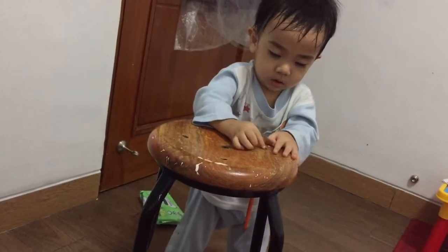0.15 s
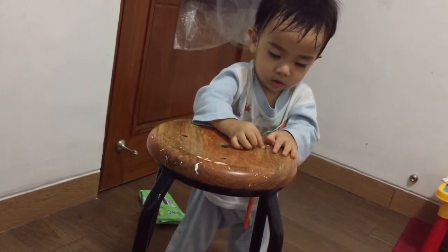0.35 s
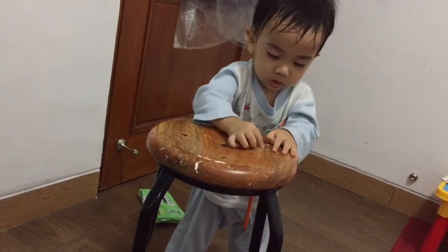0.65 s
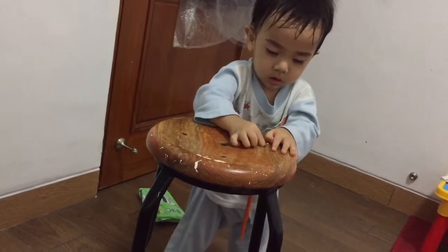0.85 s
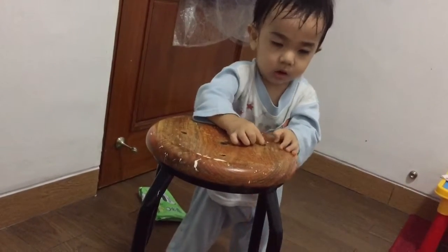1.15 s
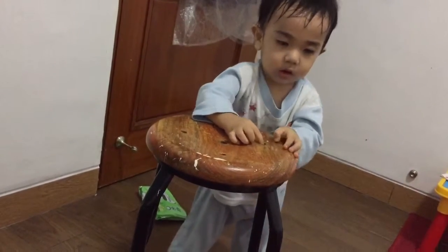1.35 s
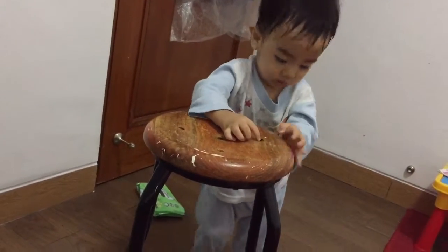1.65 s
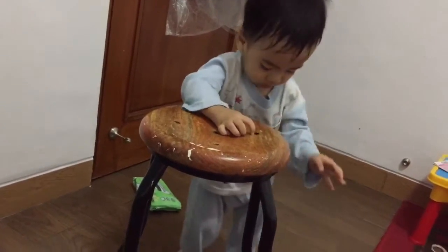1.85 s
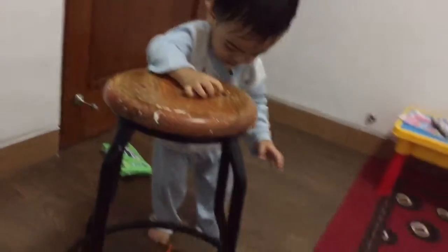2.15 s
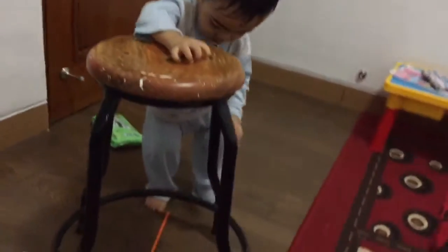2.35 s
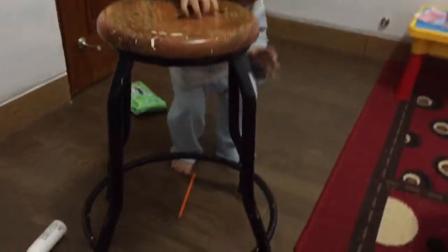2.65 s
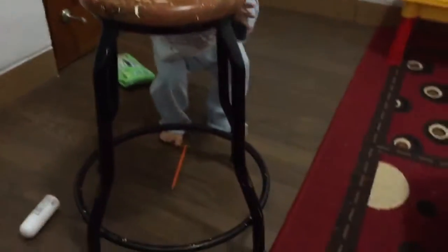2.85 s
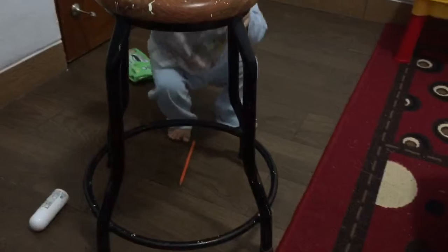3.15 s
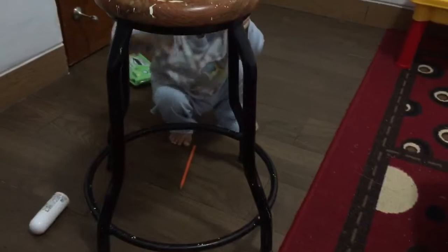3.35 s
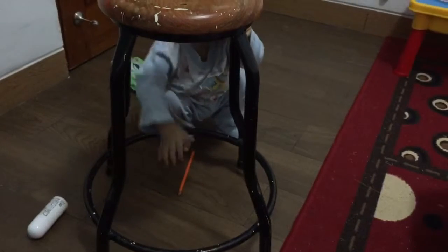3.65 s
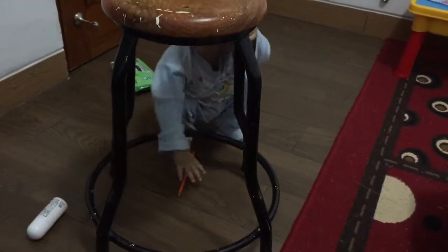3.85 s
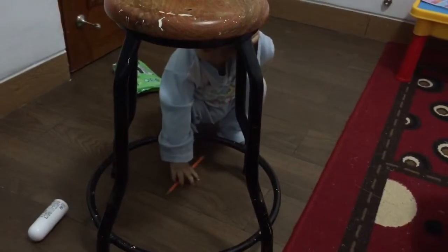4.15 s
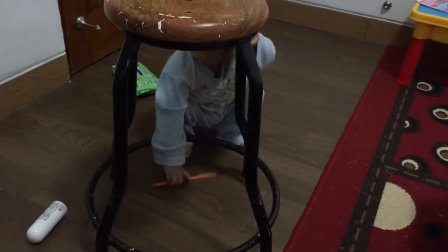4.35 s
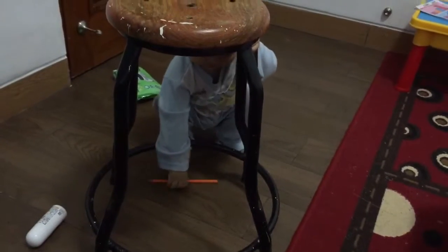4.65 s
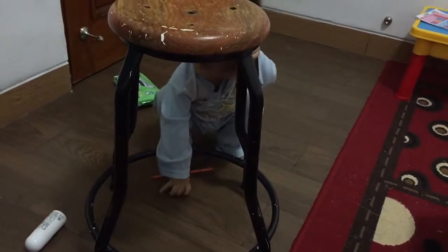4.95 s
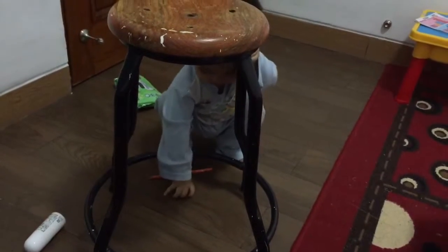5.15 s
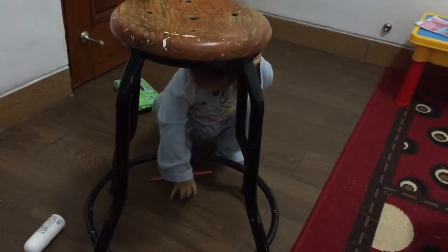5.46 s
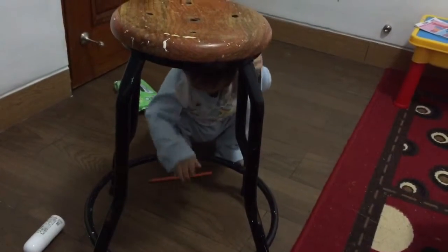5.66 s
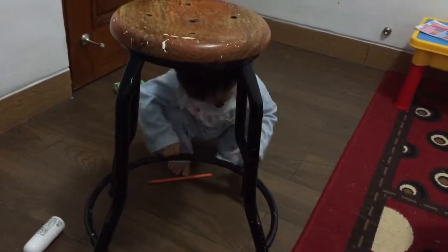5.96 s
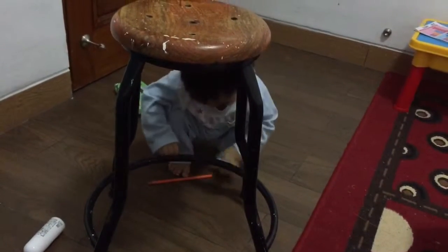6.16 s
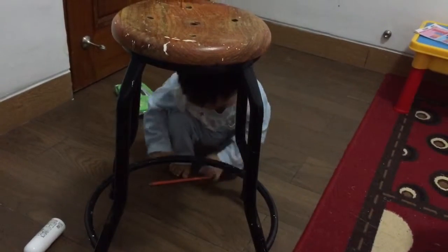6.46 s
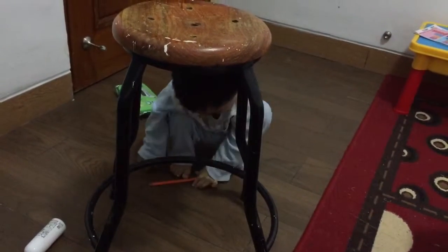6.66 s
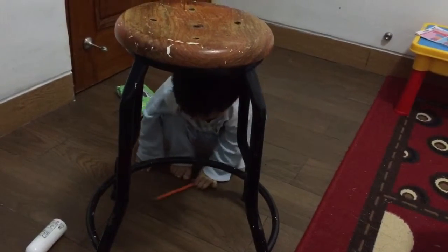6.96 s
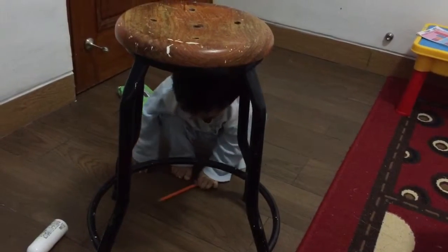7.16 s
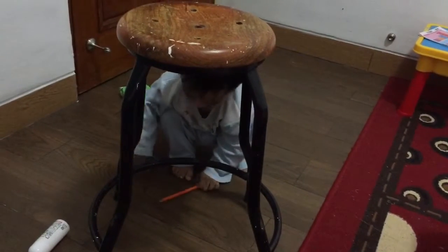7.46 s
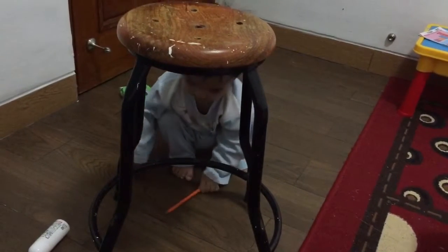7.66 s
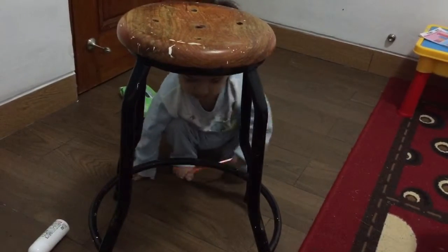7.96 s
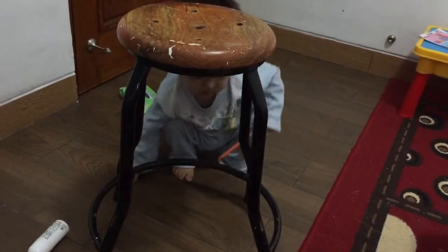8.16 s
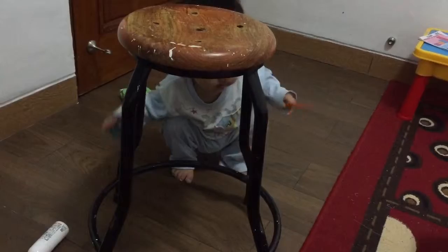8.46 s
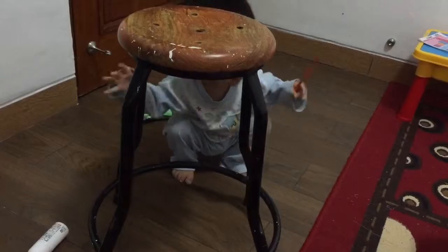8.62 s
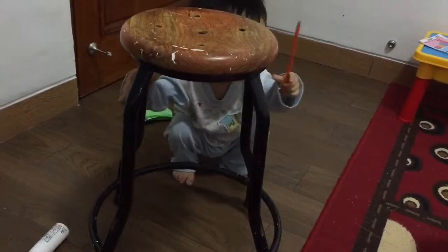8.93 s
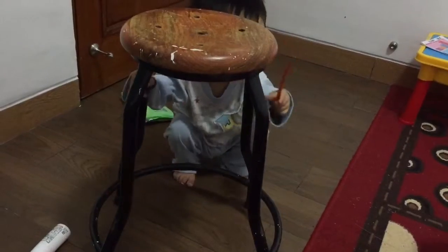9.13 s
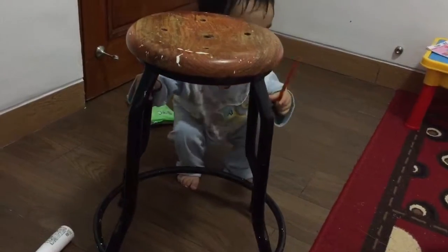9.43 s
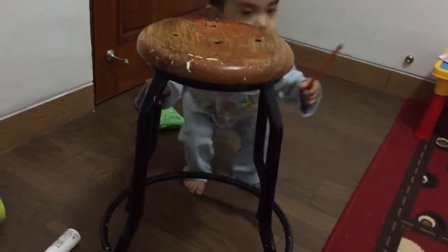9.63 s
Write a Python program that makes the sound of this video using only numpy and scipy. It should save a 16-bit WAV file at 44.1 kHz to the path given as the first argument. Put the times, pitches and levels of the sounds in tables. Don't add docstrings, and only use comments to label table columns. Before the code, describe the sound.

A wooden pencil clacks through a stool seat, bounces on a wood floor, then small hands thump and rub boards and clink steel legs.

```python
import sys
import numpy as np
from scipy import signal
from scipy.fft import rfft, irfft, next_fast_len
from scipy.io import wavfile
from scipy.ndimage import uniform_filter1d, map_coordinates

SR = 44100
rng = np.random.default_rng(int(sys.argv[2]) if len(sys.argv) > 2 else 0)


def persist_wave(psi):
    counts = np.round(np.clip(psi, -1, 1) * 32767).astype(np.int16)
    wavfile.write(sys.argv[1], SR, np.atleast_2d(counts).T)


def rack_gain(trim_db):
    fader = np.asarray(trim_db, float)
    return 10 ** (fader / 20)


N = 431738

PENCIL_CONTACTS = [(1.2377, -22.5, 0, -9, 0.5), (1.3352, -48.5, 8.5, 2, 3), (1.6328, -14.5, -25, 7, 1.5),
                   (1.6508, -32, -24, 11, 7), (1.7531, -20.5, -44, 4.5, -1), (1.7969, -30, -20, -17, -1),
                   (1.8577, -35.5, -30, -20, -2), (1.8747, -55, -22, -15, -3), (1.8803, -40, -23, -23, -2),
                   (1.933, -44, -19, -10, 3), (1.957, -38, -23, -12, -2), (1.9599, -33, -32, -20, -2.5),
                   (1.983, -50, -13, -18, 9), (1.9936, -50, -27.5, -10, 4), (3.492, -59, -28, -40, 6),
                   (3.517, -55, 4, -14, -1), (4.197, -62, -5, -17.5, 7), (4.3609, -54, -25.5, -10, 2),
                   (5.1097, -45, -22.5, -15, -6.5), (5.13, -42.5, -23, -10, -2.5),
                   (5.1418, -33, -32, 4, -2.5), (5.1445, -32, -28, 4, -2), (5.181, -37, -29, -22, -1),
                   (5.308, -58, -15, -41, -3), (8.1527, -29.5, 4.5, -11, -1), (8.525, -48.5, -19, 1, -1)]
# pitch [Hz], width [Hz], level [dB].
PENCIL_BENDING = [(2206, 290, -10.5), (4076, 165.6, -3), (6110, 360, -4.5), (8760, 650, 1.5)]
# pitch [Hz], width [Hz], level [dB].
PENCIL_TIP = [(11600, 820, 2.5), (13650, 1260, 0), (14360, 1400, 1.5)]
# pitch [Hz], width [Hz], level [dB].
PENCIL_SONG = [(2200, 70, -4), (4100, 85, 0), (6250, 130, -1)]
# pitch [Hz], width [Hz], level [dB].
STRUCK_WOOD = [(366.6, 190, -18), (970, 250, -2), (1350, 170, 1.5), (1610, 340, -1), (2370, 1000, -11),
               (3750, 440, -11), (5200, 900, -16)]

# start [s], peak [dB], board pitch [Hz], knuckle slap [dB].
THUMPS = [(1.238, -55, 243, 3), (2.965, -64, 130, 5), (3.365, -49.5, 217, -15.5), (3.804, -42, 207, -19),
          (3.832, -60.5, 200, -13), (3.969, -48, 197, -21), (5.171, -58.5, 119.6, -15),
          (5.19, -54, 52, -25), (5.49, -51.5, 101, -17), (5.629, -61, 164, 1), (6.072, -51.5, 169, -20),
          (6.11, -52.5, 189, -21), (6.724, -58, 172, -17.5), (7.322, -51, 179, -16.5),
          (8.142, -51, 218, -1), (8.385, -56, 210, 5), (8.781, -49.5, 175.4, 0.5),
          (8.822, -62.5, 183, -18.5), (9.297, -52.5, 168, -8)]
# start [s], peak [dB], board pitch [Hz], knuckle slap [dB],
# frame ring re peak [dB].
SHOVES = [
    (3.471, -41.5, 195, 1.5, -8.5),
    (3.501, -45.5, 95, 6, 1.5),
    (3.53, -40.5, 191, -32, -38),
    (5.144, -48.5, 220, -20, -5),
    (5.401, -36, 215, -7, -13),
    (5.445, -45.5, 171, 6.5, -3.5),
    (9.244, -45, 197, 0, -13),
    (9.264, -44, 82, -0.5, -10),
]
# start [s], peak [dB], pitch [Hz], width [Hz].
BUMPS = [(1.8812, -41, 6300, 250), (1.961, -44, 4050, 120), (3.474, -46, 590, 30), (3.485, -60, 3990, 27),
         (3.512, -52, 2450, 120), (3.663, -48.5, 781, 56), (3.72, -55, 750, 50), (3.76, -55, 848, 29),
         (3.815, -51, 1220, 44), (3.954, -61, 3130, 22), (5.132, -54, 4050, 40), (5.143, -47, 1350, 48),
         (5.143, -55, 945, 44), (5.1817, -44, 6300, 250), (5.41, -48, 480, 35), (6.075, -57, 2700, 90),
         (6.104, -44, 600, 16), (6.101, -53, 1290, 20), (6.103, -58, 990, 22), (6.107, -39.5, 655, 15),
         (9.254, -46, 800, 110), (8.778, -42, 690, 120), (8.785, -51, 1540, 110), (6.215, -58, 680, 14),
         (5.2, -62, 4100, 30), (9.275, -55, 1400, 70)]
# pitch [Hz], width [Hz], level [dB].
KNUCKLE = [(314, 97, 0.5), (422, 400, -8), (712, 205, -4), (1420, 250, -30)]
# pitch [Hz], level [dB], decay t60 [s].
FRAME_MODES = [(587, 0, .13), (640, -7, .13), (750, -7, .1), (860, -8, .1), (990, -3, .15), (1280, -6, .1),
               (1510, -16, .1)]

# start [s], level [dB], time of a touch [s], pitch it damps around [Hz],
# change of those modes [dB].
RAPS = [
    (8.1396, -30, 8.3, 989, -13),
    (8.3846, -31.5, 8.422, 1730, -9),
]
# level [dB], decay t60 [s].
FOOT_RING_HZ = [280, 587, 638, 707, 796, 855, 989, 1277, 1407, 1510, 1840, 1890, 2476, 2902, 2950, 3337,
                4110, 4269, 4490, 5674, 6153, 6320, 6379, 6444, 6874, 7730, 8220, 15590]
FOOT_RING = [(-22, 0.5), (-2.4, 0.38), (3.3, 0.32), (-11.4, 0.31), (-7.8, 0.3), (-8.1, 0.32), (-2.7, 0.46),
             (-4.8, 0.47), (-17.3, 0.6), (-7.2, 0.43), (-11.6, 0.36), (-9.1, 0.35), (-18.4, 0.38),
             (-17.0, 0.39), (-16, 0.25), (-11.4, 0.26), (-13.7, 0.24), (-19.4, 0.32), (-27.0, 0.42),
             (-20.7, 0.34), (-24.6, 0.55), (-14.9, 0.44), (-17.5, 0.38), (-15.2, 0.32), (-24.6, 0.32),
             (-27.1, 0.33), (-10, 0.08), (-23.2, 0.33)]
# level [dB], decay t60 [s].
LEG_HZ = [280, 587, 1277, 1507, 1596, 1711, 1749, 2401, 2680, 2740, 2793, 2898, 2950, 3349, 3468, 3532,
          3693, 3849, 4012, 4111, 4382, 4510, 4743, 5572, 5852, 7267, 8064, 8290, 8678, 15100]
LEG = [(-28.1, 0.6), (-25.4, 0.43), (-4.1, 0.27), (-11.9, 0.35), (-2.4, 0.2), (1.2, 0.22), (4.7, 0.22),
       (-21.4, 0.34), (-0.8, 0.18), (-6, 0.28), (-4.5, 0.26), (-10.5, 0.48), (-3.6, 0.29), (-7.7, 0.26),
       (-12, 0.33), (-5, 0.32), (-20.9, 0.3), (-13.0, 0.27), (-6.4, 0.24), (-6.3, 0.22), (-11.2, 0.32),
       (-12.2, 0.28), (-13, 0.25), (-12.0, 0.22), (-17.5, 0.26), (-21.9, 0.26), (-14.4, 0.4), (-20.5, 0.25),
       (3, 0.03), (-31.6, 0.3)]
# frequency [Hz], density [dB per Hz].
CLATTER = [
    [(330, -47.5), (490, -45), (570, -16), (992, -24), (1080, -36), (1280, -19), (1910, -3), (2170, -17.5),
     (4230, -15.5), (5070, -20), (6340, -17.5), (10800, -34), (15700, -44)],
    [(680, -68), (1150, -21), (1260, -11), (1720, -20), (2190, -22.5), (2730, -18), (3110, -10), (3430, -9),
     (6620, -23), (8330, -32), (10000, -35), (15700, -39)],
]

# frequency [Hz], density [dB per Hz].
SKIN = [(1470, -36), (2500, -2), (3100, -2.5), (3220, -7), (3700, -2), (4960, -13), (6590, -4),
        (7560, -5.5), (8690, -3.5), (10100, -9.5), (15700, -12)]
SCUFF = [(900, -31), (1500, -8.5), (1850, 2), (2350, -5.5), (2800, -25.5), (4500, -34)]
RUB = [(300, -48), (600, 6.5), (850, 1.5), (1300, 0.5), (1800, -2), (3000, -23.5)]
# peak time [s], peak [dB], swell over 20 dB [s],
# fade over 20 dB [s].
SKIN_STROKES = [(1.615, -64, .035, 0.016), (3.494, -66, 0.026, 0.085), (3.82, -72.5, 0.2, 0.026),
                (3.98, -64.5, 0.1, 0.065), (4.212, -79.5, .15, .12), (5.668, -78.5, 0.1, 0.19),
                (5.95, -71.5, 0.38, 0.45), (6.045, -65.5, 0.022, 0.13), (6.09, -68, 0.12, 0.061),
                (7.046, -72, 0.069, .03), (9.252, -72, 0.042, 0.16)]
SCUFF_STROKES = [(1.612, -64, 0.07, 0.064), (2.854, -57, 0.011, 0.016), (3.494, -69, 0.13, 0.42),
                 (3.82, -80, .45, 0.073), (3.988, -79.5, 0.078, .06), (4.212, -74, 0.059, 0.28),
                 (5.69, -68.5, 0.11, 0.27), (6.082, -77.5, 0.095, .03), (7.046, -83, 0.11, .15),
                 (7.946, -58.5, 0.017, 0.15), (8.778, -75.5, 0.043, .04), (9.252, -78, 0.052, 0.2)]
RUB_STROKES = [
    (2.854, -78, .06, .04),
    (3.494, -52.5, 0.046, 0.056),
    (3.82, -54.5, 0.34, 0.082),
    (3.988, -49, 0.092, 0.08),
    (5.69, -67, 0.14, 0.37),
    (6.11, -53, 0.066, 0.067),
    (7.046, -69, 0.33, .08),
    (8.778, -58, 0.024, 0.017),
    (9.252, -48.5, 0.014, 0.064),
]

# start [s], peak [dB], base pitch [Hz] (it sags to 0.55 of
# this), # length [s].
GRIP_POPS = [
    (2.489, -64, 100.3, 0.059),
    (2.704, -46, 120.5, 0.019),
    (2.844, -45, 102, 0.02),
    (9.672, -55.5, 104.5, 0.037),
]

# frequency [Hz], density [dB per Hz].
RUMBLE = [(12, -58), (20, -26), (35, 3), (59, 4.5), (151, -5.5), (182, -3), (214, -5.5), (280, -5),
          (308, -5.5), (500, -16.5), (650, -43), (1100, -120)]
HISS = [(240, -15), (400, -5), (519, -3.5), (889, -2.5), (1250, -4.5), (1950, -2), (2420, -5), (2750, -8.5),
        (3280, -9.5), (3540, -8), (4890, -14), (9460, -18.5), (10400, -20), (13100, -20), (15700, -23)]
# time [s], rumble level [dB].
RUMBLE_LEVEL = [(0.0, -70.5), (1.75, -71), (3.9, -67), (4.4, -70.5), (9.79, -70.5)]
# pitch [Hz], amplitude [dB].
WHIRR_TONES = [(183, -83), (1911, -87), (2428, -91), (3601, -94)]

# frequency [Hz], t60 [s].
ROOM_DECAY = [(100, 0.42), (500, 0.28), (2000, 0.29), (6000, 0.26), (10000, .26), (15000, 0.22)]
# delay [s], level [dB].
WALL_ECHOES = [(.0013, -5), (.0023, -9), (.0036, -12), (.0062, -15), (.0182, -17), (.0305, -24)]
# frequency [Hz], width [Hz], depth [dB].
PORT_DIPS = [(3470, 600, -1), (5040, 240, -2.5), (7590, 572, -3.5), (10280, 370, -4)]


def pencil():
    out = np.zeros(N)
    tip, wood, song = knock(PENCIL_TIP), knock(STRUCK_WOOD), knock(PENCIL_SONG)
    t = np.arange(8192) / SR
    thin = signal.lfilter(*signal.butter(3, 900, "high", fs=SR), t[:256] == 0)
    blow_delay = 0.0005
    for s, db, wood_db, sharp_db, direct_db in PENCIL_CONTACTS:
        tilt_db = 0.8 + 0.45 * min(db + 45, 0) + 0.038 * sharp_db
        body = knock([(hz, w, level + k * tilt_db) for k, (hz, w, level) in enumerate(PENCIL_BENDING)])
        free = body + rack_gain(-17) * song + rack_gain(sharp_db) * tip
        blow = np.convolve(free, thin)[:len(t)] + rack_gain(wood_db) * wood
        place(out, s + blow_delay, rack_gain(db - 2 + direct_db) * blow, wet_db=-3.5 - direct_db, wall_db=-0.5)

        grit = signal.lfilter([1, 0, 0, -1], 1, rng.standard_normal(len(t)))
        crack = np.convolve((grit * np.exp(-t / 0.0005))[:1024], thin)
        crack_db = db - 8 + 0.5 * sharp_db + direct_db
        place(out, s + blow_delay, rack_gain(crack_db) * crack, wet_db=-6 - direct_db, wall_db=-1)
    return out


def thumps():
    out = np.zeros(N)
    slap = np.convolve(knock(KNUCKLE), np.hanning(SR // 1500), "same")
    slap /= np.abs(slap).max()
    far_frame_db, bump_slap_db = -42, -49
    on_boards = [(*row, far_frame_db) for row in THUMPS] + [tuple(row) for row in SHOVES]
    blows = [(s, db, hz, 29 + 0.058 * hz, slap_db, frame_db) for s, db, hz, slap_db, frame_db in on_boards]
    blows += [(*row, bump_slap_db, far_frame_db) for row in BUMPS]
    for s, db, hz, width, slap_db, frame_db in blows:
        blow = rack_gain(frame_db) * ring(FRAME_MODES, scatter_db=2.5, attack=0.003)
        board = knock([(hz, max(width, 8), 0)])
        press = np.hanning(round(SR / hz))
        board = np.convolve(board, press)[:len(slap)]
        blow[:len(slap)] += board / np.abs(board).max() + rack_gain(slap_db) * slap
        wet_db, wall_db = (-3, -3) if hz < 400 else (-7, -9)
        place(out, s, rack_gain(db - 1.5) * blow, wet_db, wall_db)
    return out


def steel():
    out = np.zeros(N)
    t = np.arange(SR // 2) / SR
    tubes = np.column_stack([FOOT_RING_HZ, FOOT_RING]), np.column_stack([LEG_HZ, LEG])
    clatter_db, clatter_t60 = (-38.5, -32.5), (0.35, 0.28)
    for rap, modes, colour, fuzz_db, t60 in zip(RAPS, tubes, CLATTER, clatter_db, clatter_t60):
        s, db, touch, near_hz, damp_db = rap
        held = np.clip((t + s - touch) / 0.004, 0, 1)
        near = abs(modes[:, 0] - near_hz) < 60
        touched = ring(modes[near], scatter_db=0, attack=0.0006, alike_hz=SR, cycles=1.2)
        untouched = ring(modes[~near], scatter_db=0, attack=0.0003, alike_hz=1100, cycles=1.2)
        x = rack_gain(db + damp_db * held) * touched + rack_gain(db) * untouched
        x += rack_gain(fuzz_db - 60 * t / t60) * noise(colour, len(t))
        place(out, s, x, wet_db=-14, wall_db=-16)
    return out


def slides():
    hiss = rack_gain(3.8 * wobble(90)) * noise(SKIN, N)
    scuff = rack_gain(2.47 * wobble(70)) * noise(SCUFF, N)
    rub = rack_gain(0.68 * wobble(50) - 7.5) * noise(RUB, N)
    return strokes(SKIN_STROKES) * hiss + strokes(SCUFF_STROKES) * scuff + strokes(RUB_STROKES) * rub


def strokes(rows):
    t = np.arange(N) / SR
    return sum(rack_gain(db - 20 * np.maximum((s - t) / swell, (t - s) / fade)) for s, db, swell, fade in rows)


def grip():
    out = np.zeros(N)
    for s, db, hz, length in GRIP_POPS:
        u = np.arange(round(length * SR)) / (length * SR)
        cycles = np.cumsum(hz * (0.55 + 2.9 * np.exp(-u / 0.135))) / SR
        swell = np.sin(np.pi * u ** 0.68)
        out[round(s * SR):][:len(u)] += rack_gain(db) * swell * np.sin(2 * np.pi * cycles)
    return out


def hush():
    rumble_db = np.interp(np.arange(N) / SR, *np.transpose(RUMBLE_LEVEL))
    rumble = rack_gain(rumble_db + 0.99 * wobble(21)) * patchy(noise(RUMBLE, N), depth_db=2)
    hiss = rack_gain(-67 + 0.67 * wobble(12)) * patchy(noise(HISS, N), depth_db=0.9)
    return rumble + hiss


def whirr():
    t = np.arange(N) / SR
    out = np.zeros(N)
    for hz, db in WHIRR_TONES:
        out += rack_gain(db + 3.4 * wobble(3.6)) * np.sin(2 * np.pi * hz * t + 1.5 * wobble(5.6))
    return out


def knock(peaks):
    f = np.fft.rfftfreq(8192, 1 / SR)
    response = 0
    for k, (hz, width, db) in enumerate(peaks):
        loss = 1j * f * width
        response = response + (-1) ** k * rack_gain(db) * loss / (hz * hz - f * f + loss)
    x = irfft(response)
    return x / np.abs(x).max()


def ring(modes, scatter_db, attack, alike_hz=0, cycles=0):
    t = np.arange(SR // 2) / SR
    hz, db, t60 = np.transpose(modes)[:, :, None]
    luck = rng.standard_normal(hz.shape)
    side = np.where(hz < alike_hz, 1, rng.choice([-1, 1], hz.shape))
    decay = rack_gain(db + scatter_db * luck - 60 * t / np.clip(t60, 0.02, 0.6))
    rise = 1 - np.exp(-t / (attack + cycles / hz))
    return (side * decay * rise * np.sin(2 * np.pi * hz * t)).sum(axis=0)


def place(out, s, x, wet_db, wall_db):
    hz, t, z = signal.stft(rng.standard_normal(SR // 3), SR, nperseg=256)
    tail = signal.istft(z * rack_gain(-60 * t / along(ROOM_DECAY, hz)[:, None]), SR, nperseg=256)[1]
    t = np.arange(len(tail)) / SR
    tail *= 1 - np.exp(-(t / 0.0077) ** 2)
    tail *= rack_gain(wet_db) / np.linalg.norm(tail)
    tail[0] = 1
    for delay, db in WALL_ECHOES:
        smear = rng.standard_normal(len(t)) * (t >= delay) * np.exp(-abs(t - delay) / 0.0005)
        tail += rack_gain(db + wall_db) * smear / np.linalg.norm(smear)
    wet = signal.fftconvolve(x, tail)
    room = out[round(s * SR):][:len(wet)]
    room += wet[:len(room)]


def noise(spectrum, size):
    m = next_fast_len(size)
    gain = rack_gain(along(spectrum, np.fft.rfftfreq(m, 1 / SR)))
    return unit(irfft(rfft(rng.standard_normal(m)) * gain, m)[:size])


def patchy(x, depth_db):
    z = signal.stft(x, nperseg=512)[2]
    field = uniform_filter1d(rng.standard_normal(z.shape), size=8, axis=0)
    field = uniform_filter1d(field, size=10, axis=1)
    return unit(signal.istft(z * rack_gain(depth_db * unit(field)), nperseg=512)[1][:N])


def wobble(rate):
    knots = rng.standard_normal(int(N * rate / SR) + 4)
    return map_coordinates(knots, [np.arange(N) * rate / SR])


def along(points, hz):
    f, v = np.transpose(points)
    return np.interp(np.log(hz + 1), np.log(f + 1), v)


def unit(x):
    return x / np.sqrt(np.mean(x ** 2) + 1e-20)


def scene():
    return (pencil() + thumps() + steel() + slides() + grip() + hush() + whirr())[None]


def band_limit(x):
    return signal.sosfilt(signal.butter(12, 17030, fs=SR, output="sos"), x)


def record(dry):
    m = next_fast_len(N + SR // 4)
    f = np.fft.rfftfreq(m, 1 / SR)
    dips_db = sum(db * np.exp(-((f - hz) / w) ** 2) for hz, w, db in PORT_DIPS)
    bass = (1j * f / (35 + 1j * f)) ** 4
    top = np.sin(np.pi / 2 * np.clip((15800 - f) / 160, 0, 1)) ** 2
    top += rack_gain(-30) * (f < 17000)
    mix = irfft(rfft(dry, m) * rack_gain(dips_db) * bass * top, m)[:, :N]
    return band_limit(mix)


dry = scene()
out = record(dry)
persist_wave(out)
```